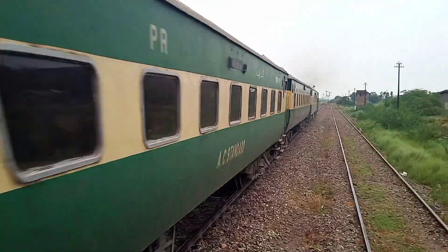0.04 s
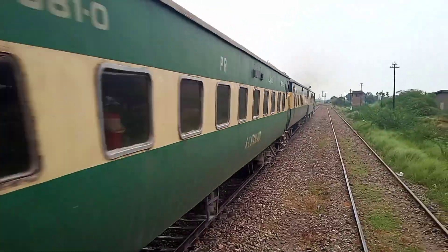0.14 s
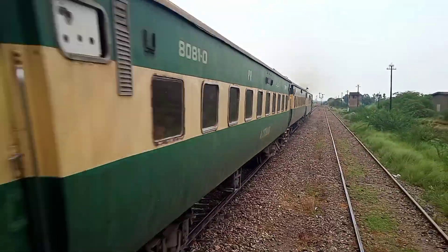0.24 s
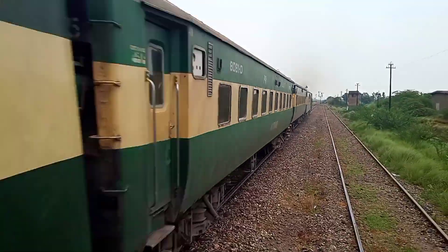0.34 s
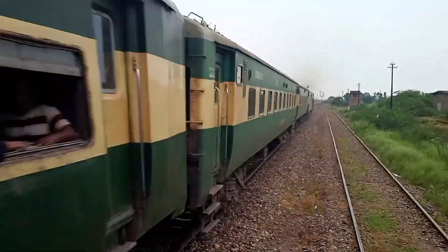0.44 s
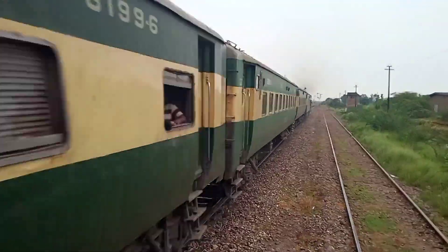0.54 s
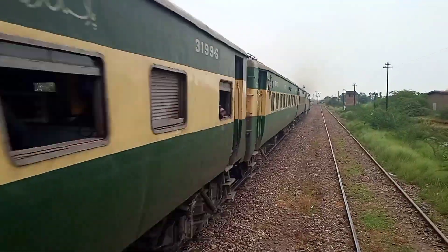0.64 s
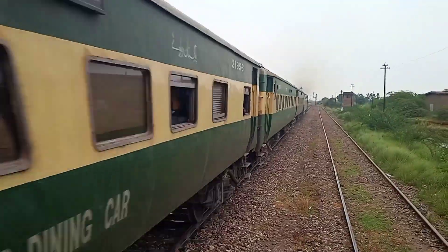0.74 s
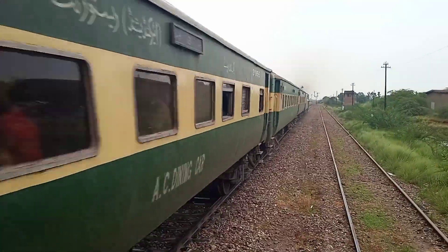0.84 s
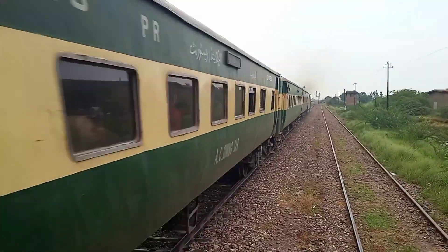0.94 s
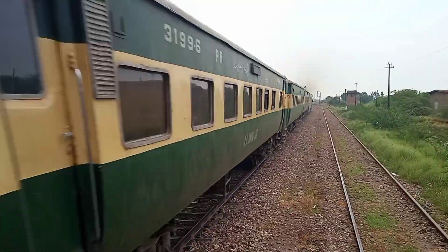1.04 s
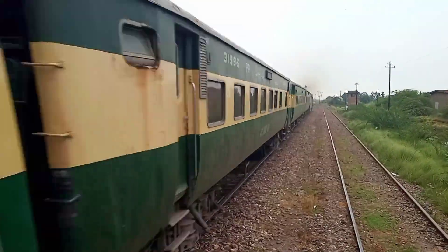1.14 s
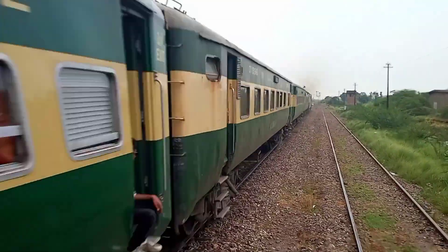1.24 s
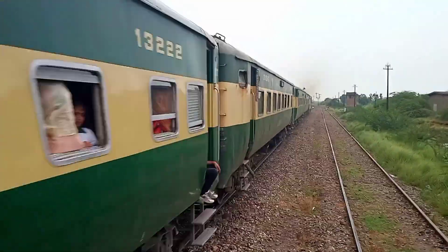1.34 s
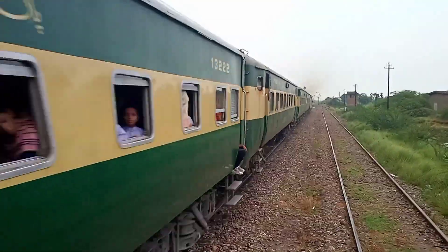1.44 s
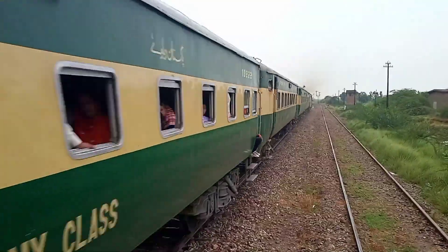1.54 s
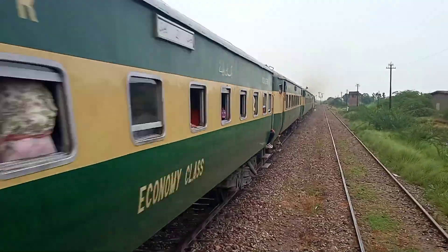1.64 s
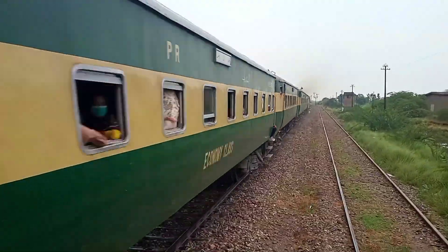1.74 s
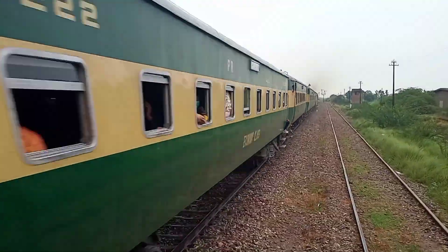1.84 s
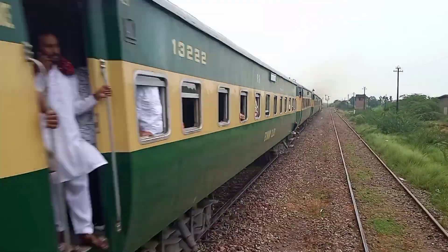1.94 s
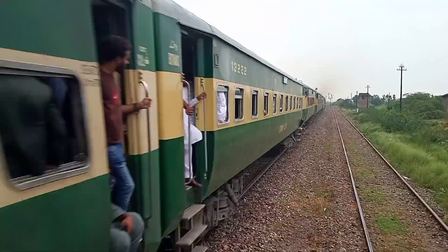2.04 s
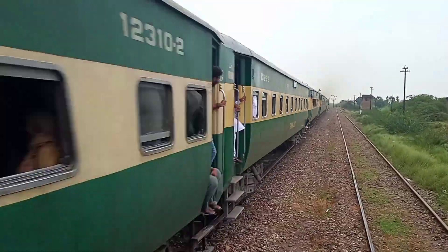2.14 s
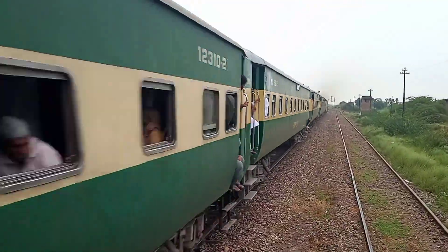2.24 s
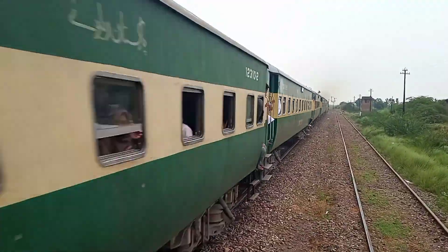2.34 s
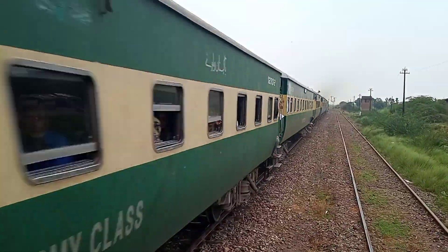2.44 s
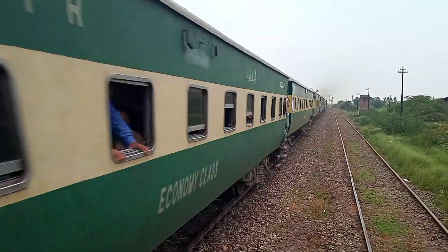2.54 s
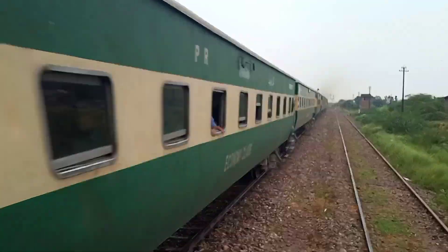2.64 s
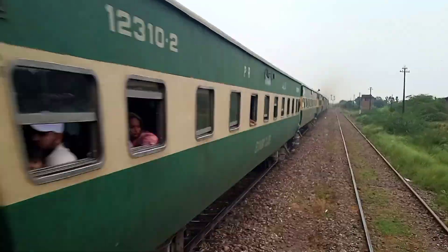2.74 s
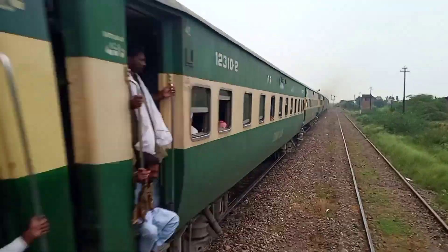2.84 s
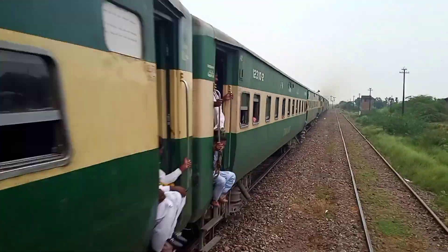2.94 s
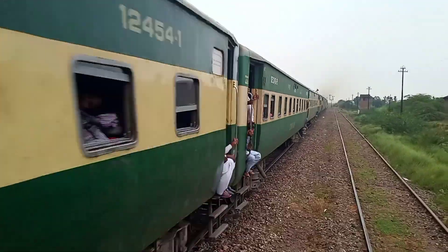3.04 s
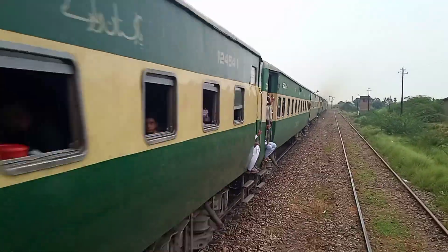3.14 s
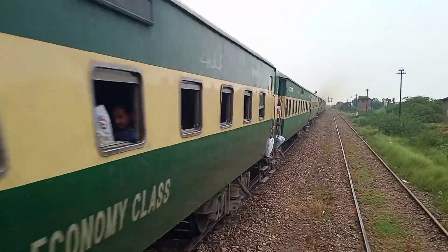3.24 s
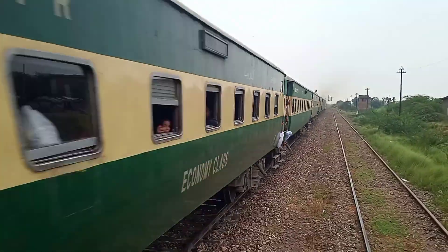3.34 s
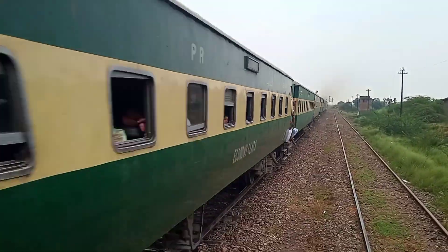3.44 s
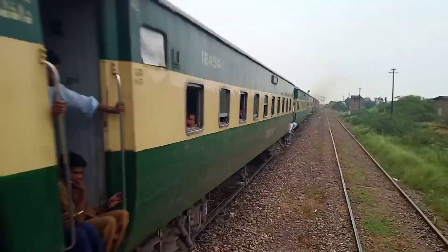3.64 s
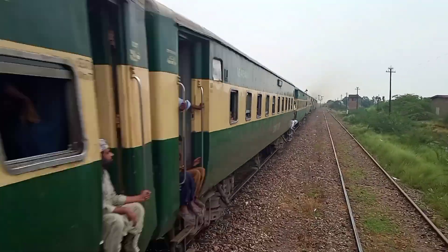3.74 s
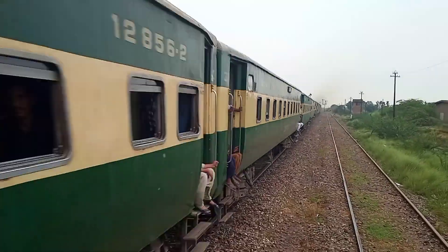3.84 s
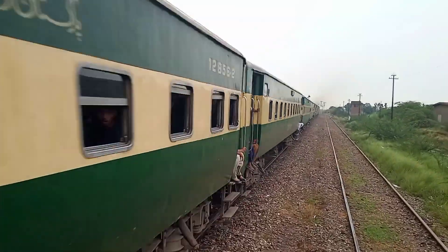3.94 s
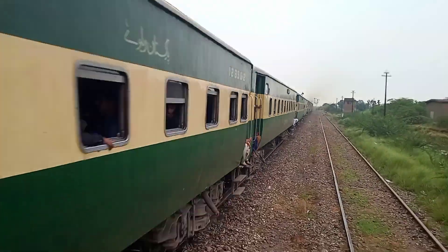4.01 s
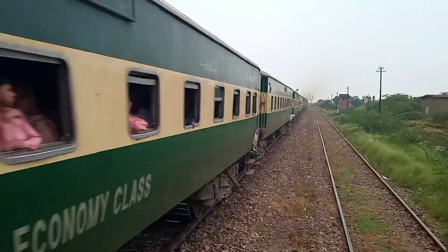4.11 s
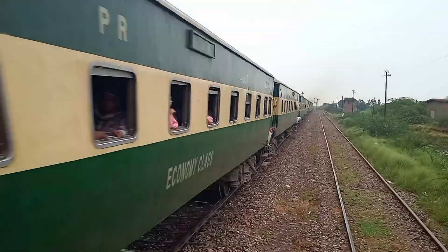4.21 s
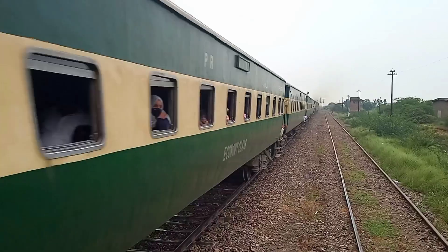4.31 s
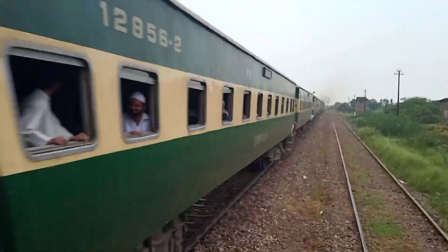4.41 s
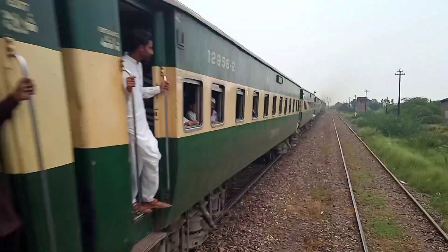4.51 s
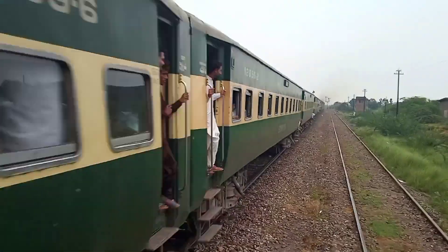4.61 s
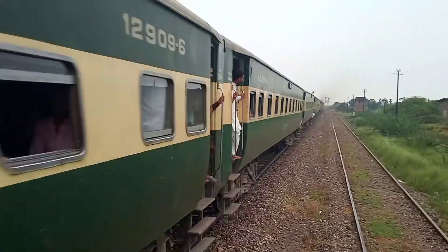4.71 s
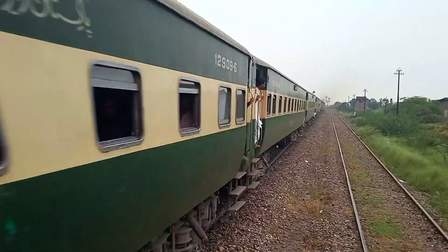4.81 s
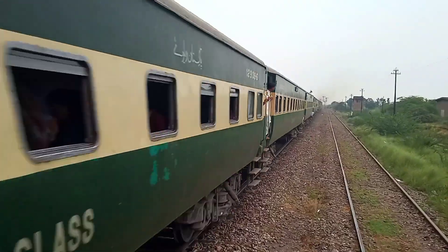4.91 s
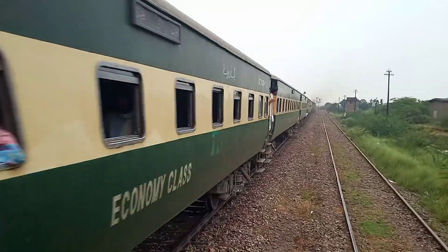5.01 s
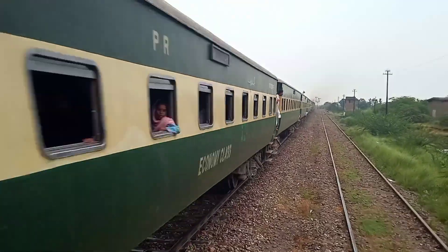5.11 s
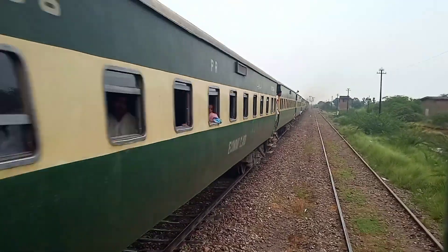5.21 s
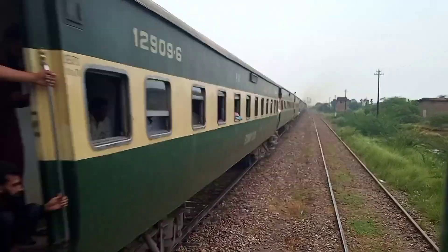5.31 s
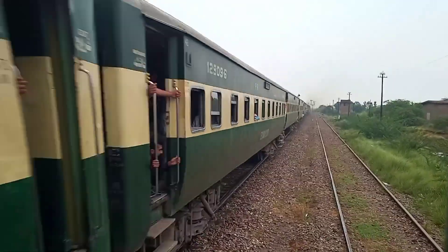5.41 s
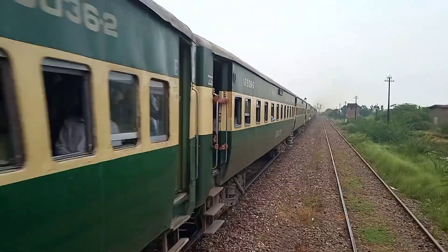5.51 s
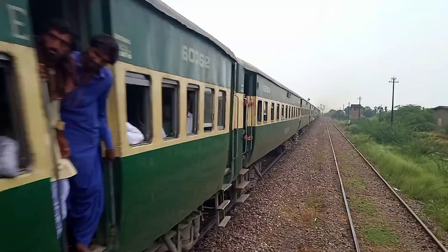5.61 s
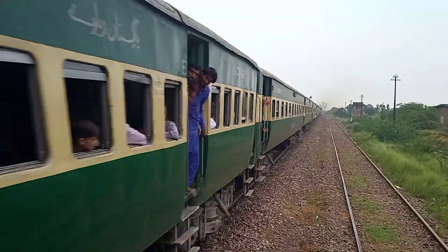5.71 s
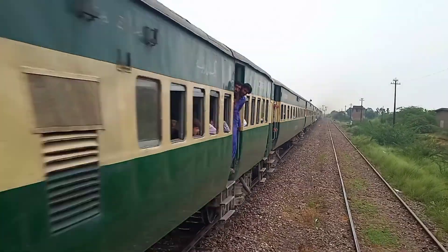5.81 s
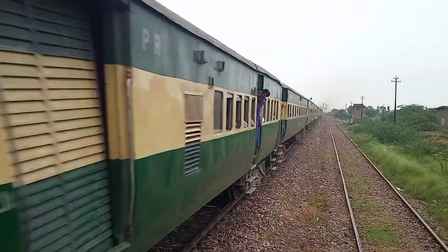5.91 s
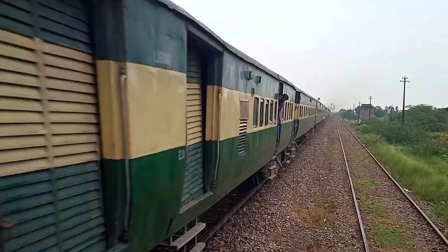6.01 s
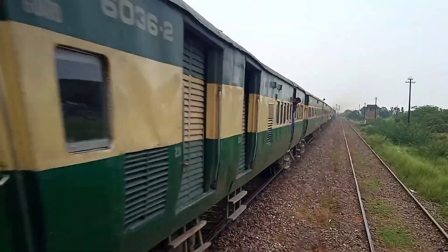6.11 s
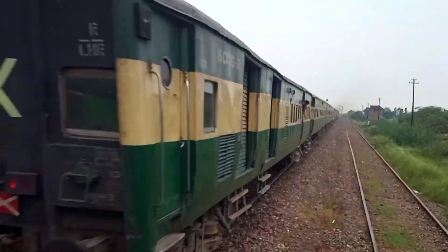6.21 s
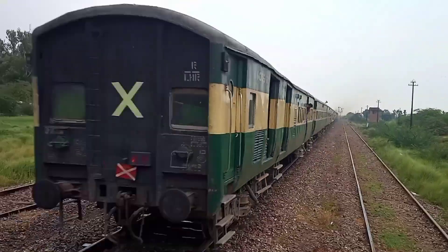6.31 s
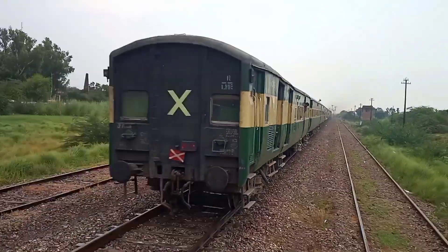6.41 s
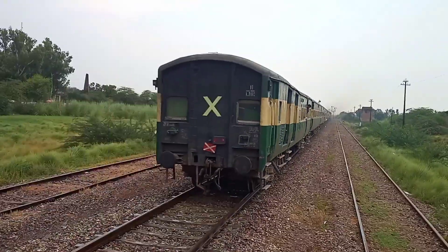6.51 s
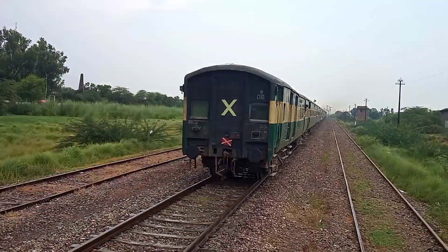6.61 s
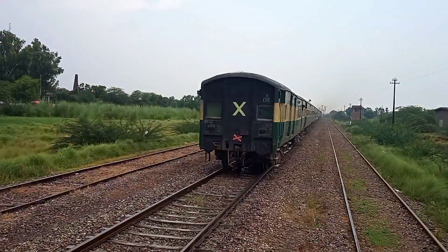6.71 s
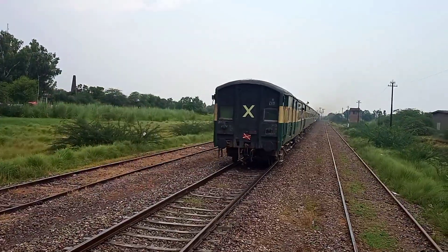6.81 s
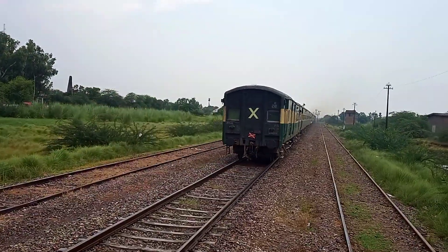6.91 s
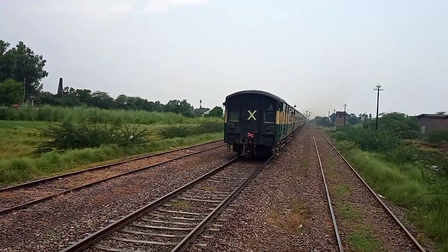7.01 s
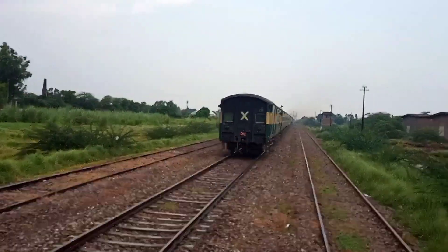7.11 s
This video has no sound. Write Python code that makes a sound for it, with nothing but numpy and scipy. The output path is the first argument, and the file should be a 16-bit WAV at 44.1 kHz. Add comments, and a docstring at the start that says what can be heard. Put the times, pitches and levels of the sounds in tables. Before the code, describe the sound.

From 0 s a passenger train is already rushing past close by on the next track, heard from a train going the other way. Bright, dense steel hiss centred around 5 to 6 kHz covers a rougher midrange roar and low rumble, shuddering unevenly and lifting slightly about every 0.86 s as wheels pass. Faint chirps and wavering rim rings sit inside it. Small squeaks and a scrape come near 1.6 to 1.8 s, another scrape at 2.9 s, a quick gritty clatter at 3.3 s, a squeak at 3.4 s, then clustered squeals and scrapes from 4.1 to 4.6 s. Wind bumps the small microphone throughout, notably at 3.7 s and most heavily at 5 to 5.5 s. The rush eases slightly, then collapses between 6.1 and 6.5 s as the last coach leaves. Until about 7.1 s only faint receding hiss, steady underfloor rolling and small air thumps remain. Identical in both channels.

```python
"""Wheels hiss and roar close by on the next track: a passenger train passes, heard from a train
running the other way; its last coach is gone at 6.3 s. Rolling noise is coloured, patchy noise.
The rims ring faintly as narrow resonances and notes, flanges chirp and scrape in clusters of short tones,
the running gear clatters as struck modes and squeaks on unsteady notes,
and the slipstream buffets a single small microphone with bursts of low noise."""
import sys
import numpy as np
from scipy import signal
from scipy.fft import rfft, irfft
from scipy.io import wavfile
from scipy.ndimage import uniform_filter1d

SR = 44100
rng = np.random.default_rng(int(sys.argv[2]) if len(sys.argv) > 2 else 0)


def unload_audio(sound):
    """Save the sound as a 16-bit wav file, at the path given as the first command line argument."""
    columns = np.transpose(np.atleast_2d(sound))
    # keep every value between -1 and 1, then stretch to whole-number steps
    steps = np.round(np.clip(columns, -1, 1) * 32767)
    wavfile.write(sys.argv[1], SR, steps.astype(np.int16))


N = 315315
TIME = np.arange(N) / SR
FRAME, HOP = 1025, 256  # samples, for colouring noise

# The wheels going by, before each layer's own trim.
# Each row: time in seconds, hiss level in dB, roar level in dB.
WHEELS = [(0.0,-21.5,-29.5), (0.69,-24.5,-28), (0.75,-22,-28), (0.96,-21.5,-28.5), (2.01,-22.5,-31),
          (2.25,-24,-26), (3.06,-21.5,-30), (3.12,-24,-28.5), (4.23,-22,-30), (4.32,-22.5,-30),
          (4.77,-25,-31), (4.83,-24,-27.5), (5.7,-25,-29), (6.09,-25.5,-30), (6.33,-28.5,-32.4),
          (6.51,-36.4,-41.5), (6.99,-36,-44.5), (7.15,-46,-53)]
# Colour of the hiss of steel on steel. Each row: frequency in Hz, relative density in dB.
HISS_COLOUR = [(1500, -70), (3200, -24), (4100, -19.5), (4500, -4), (5000, -1), (5600, 0), (6100, -4),
               (6600, -17), (7100, -23), (8500, -41.5)]


def gain_of(db):
    """Decibels to amplitude."""
    return 10 ** (np.asarray(db) / 20)


def evened(x):
    """Scales to rms 1."""
    return x / np.sqrt(np.mean(x ** 2) + 1e-20)


def curve(table, column):
    """One column of a time table at every sample."""
    rows = np.transpose(table)
    return np.interp(TIME, rows[0], rows[column])


def read(points, hz):
    """A spectrum in dB, interpolated on a log-frequency axis."""
    f, db = np.transpose(points)
    return np.interp(np.log(hz + 1), np.log(f + 1), db)


def add(mix, s, sound):
    """Mixes a sound in at time s."""
    part = mix[round(s * SR):][:len(sound)]
    part += sound[:len(part)]


def wander(rate_hz):
    """Slow chance of rms 1: noise that loses strength above the given rate."""
    hz = np.fft.rfftfreq(N, 1 / SR)
    slow = rfft(rng.standard_normal(N)) / (1 + (hz / rate_hz) ** 4)
    return evened(irfft(slow, N))


def rush(spectrum, patchy_db, patch_hz, patch_s):
    """Noise of a given colour, rms 1, in which patches of the spectrum swell and fade."""
    hz, _, z = signal.stft(rng.standard_normal(N), SR, nperseg=FRAME, noverlap=FRAME - HOP)
    bins, frames = max(1, round(patch_hz * FRAME / SR)), max(1, round(patch_s * SR / HOP))
    patches = uniform_filter1d(rng.standard_normal(z.shape), bins, axis=0)
    patches = evened(uniform_filter1d(patches, frames, axis=1))
    z = z * gain_of(read(spectrum, hz)[:, None] + patchy_db * patches)
    _, noise = signal.istft(z, SR, nperseg=FRAME, noverlap=FRAME - HOP)
    return evened(noise[:N])


def resonate(x, hz, width):
    """A resonance of gain 1 and a width in Hz that follows a pitch."""
    turn = np.exp(2j * np.pi * np.cumsum(hz * np.ones(len(x))) / SR)
    r = np.exp(-np.pi * width / SR)
    # turn the pitch down to zero, smooth there, turn it back up
    return 2 * (turn * signal.lfilter([1 - r], [1, -r], x / turn)).real


def swells(table, column, edge_s):
    """Gain over time of events that rise, hold and fall; the edges are centred on start and end."""
    out = np.zeros(N)
    for row in table:
        start, length = row[0], row[1]
        inside_s = np.minimum(TIME - start, start + length - TIME)
        out += gain_of(row[column]) * np.clip(.5 + inside_s / edge_s, 0, 1)
    return out


def wheel_levels():
    """Hiss and roar in dB, lifted as a pair of bogies goes by with every coach."""
    coach_s, first_bogie_s = 0.857, .01
    bogie_hiss_db, bogie_roar_db = .5, 0.5
    bogies = np.cos(2 * np.pi * (TIME - first_bogie_s) / coach_s)
    hiss_db = curve(WHEELS, column=1) + bogie_hiss_db * bogies
    roar_db = curve(WHEELS, column=2) + bogie_roar_db * bogies
    return hiss_db, roar_db


def rolling():
    """Rough steel on steel: hiss, roar, rumble and fizz, all shaken by the same uneven rail."""
    # Colours of the rolling noise. Each row: frequency in Hz, relative density in dB.
    roar_colour = [(300, -60), (1000, -22.5), (1350, -10), (1650, -6.5), (1900, -2.5), (2250, -2.5),
                   (2800, 1), (3400, -2.5), (4200, 0), (5500, -9), (8500, -44)]
    rumble_colour = [(40, -46), (110, -9), (200, 3), (330, 6), (450, 0.5), (620, -2), (950, 1.5),
                     (1200, 0.5), (1800, -8.5), (4000, -30)]
    fizz_colour = [(5500, -16), (7500, 4), (9000, 5), (11000, 5), (12800, -6), (14000, -15), (14700, 9),
                   (15700, 7.5)]
    hiss_db, roar_db = wheel_levels()
    # the rumble carries far: it keeps only a share of the roar's rise and fall
    rumble_db = -27.5 + 0.43 * roar_db
    judder, surge = wander(rate_hz=14.4), wander(rate_hz=7.7)

    hiss = rush(HISS_COLOUR, patchy_db=1.5, patch_hz=300, patch_s=.045)
    hiss *= gain_of(hiss_db - 0.36 + 0.72 * judder + 0.51 * surge)
    roar = rush(roar_colour, patchy_db=2.0, patch_hz=220, patch_s=0.06)
    roar *= gain_of(roar_db + 1.06 + .5 * judder + 0.24 * surge)
    rumble = rush(rumble_colour, patchy_db=3.0, patch_hz=130, patch_s=0.046)
    rumble *= gain_of(rumble_db + 1.1 * judder)
    # the finest spray of the hiss flutters most
    flutter_db = .8 * judder + .8 * surge + 1.5 * wander(rate_hz=64)
    fizz = rush(fizz_colour, patchy_db=2.5, patch_hz=1500, patch_s=.04)
    fizz *= gain_of(0.8 * hiss_db - 29.5 + flutter_db)
    return hiss + roar + rumble + fizz


def own_wheels():
    """Our own wheels, further off under the floor: a steady bed of coloured, patchy noise."""
    # Colour of that bed. Each row: frequency in Hz, relative density in dB.
    own_colour = [(60, -28), (250, -7), (550, -4.5), (830, 3), (1100, -14), (1350, 7), (2000, -14),
                  (3300, -11), (4100, 6.5), (5200, 0), (8000, -40)]
    return gain_of(-43.5) * rush(own_colour, patchy_db=-2.0, patch_hz=200, patch_s=0.046)


def rims():
    """Rail roughness keeps two wheel modes simmering; now and then the lower one rings out as a clear note."""
    # A wheel rim rings out. Each row: start in seconds, length in seconds, level in dB.
    rings = [(.06, 0.27, -38.5), (1.24, 0.056, -34.5), (1.57, 0.19, -37), (2.1, 0.24, -40.5),
             (2.45, 0.091, -43), (2.85, 0.11, -41.5), (4.06, 0.06, -38.5), (4.26, .15, -39),
             (4.92, 0.25, -43)]
    low_hz, high_hz = 1452, 2670
    under_roar_db = -15
    drift = 1 + 0.016 * wander(rate_hz=2.7)
    low = resonate(rng.standard_normal(N), low_hz * drift, width=170)
    low = evened(resonate(low, low_hz * drift, width=170))
    high = evened(resonate(rng.standard_normal(N), high_hz * drift, width=250))
    simmer = low * gain_of(3.6 * wander(rate_hz=14))
    simmer += high * gain_of(-4.5 + 1.8 * wander(rate_hz=17))
    simmer *= gain_of(curve(WHEELS, column=2) + under_roar_db)

    pitch = low_hz * (1 + 0.0173 * wander(rate_hz=60.6))
    note = np.sin(2 * np.pi * np.cumsum(pitch) / SR)
    note = evened(note * gain_of(3.9 * wander(rate_hz=38)))
    return simmer + note * swells(rings, column=2, edge_s=0.033)


def chirp_cloud(count, low_hz, high_hz, glide):
    """Short notes at random times and pitches, each falling a little as it goes by."""
    out = np.zeros(N)
    for when, pitch, span, size in rng.random((count, 4)):
        u = np.linspace(-1, 1, round((0.034 + 0.056 * span) * SR))
        hz = (low_hz + pitch * (high_hz - low_hz)) * (1 - glide * u / 2)
        note = np.sin(2 * np.pi * np.cumsum(hz) / SR) * signal.windows.hann(len(u))
        # high notes radiate better
        add(out, when * N / SR, size * hz / high_hz * note)
    return out


def chirps():
    """Flanges touch the rail all along the train: faint chirps inside the hiss."""
    cloud = chirp_cloud(count=260, low_hz=1596, high_hz=6510, glide=0.021)
    return cloud * gain_of(curve(WHEELS, column=1) - 2)


def slipstream(steadiness=0.72):
    """Eddies thump the microphone: deep gusts and a lighter flutter, over restless air."""
    # Eddies hitting the microphone, levels before the trim and wander below.
    # Each row: start in seconds, length in seconds, deep thump in dB, light flutter in dB.
    gusts = [(0.2, 0.15, -42.5, -29.5), (0.66, 0.051, -50, -34), (0.96, 0.07, -50, -35),
             (1.35, 0.21, -40.5, -45), (1.59, 0.11, -37, -45), (1.8, 0.11, -40, -41),
             (2.08, 0.054, -44, -30.5), (2.94, 0.051, -37.5, -40), (3.51, 0.06, -43, -32.5),
             (3.72, 0.12, -26.5, -30), (3.83, 0.13, -37, -31.5), (4.08, 0.14, -36.5, -50),
             (4.34, 0.056, -37, -47), (4.48, 0.09, -40, -36.5), (4.75, 0.068, -42, -35.5),
             (5.01, 0.072, -31.5, -32), (5.1, 0.12, -33, -32), (5.21, 0.11, -25, -36),
             (5.39, 0.049, -18, -32), (5.45, 0.1, -25, -36), (5.88, 0.078, -29, -33.5),
             (5.98, 0.19, -38.5, -39), (6.45, 0.086, -35.5, -42), (6.55, 0.065, -30.5, -47),
             (6.75, 0.053, -34, -45)]
    # Colours of the deep and the light air. Each row: frequency in Hz, relative density in dB.
    deep_colour = [(22, -50), (45, -22), (75, 1.5), (115, 7.5), (160, 1), (210, -26.5), (400, -33),
                   (1200, -59)]
    light_colour = [(60, -37), (125, -18), (175, 2), (250, 0.5), (330, -10), (480, -23), (1200, -56)]
    edge_s = 0.045
    gust = rush(deep_colour, patchy_db=5.5, patch_hz=60, patch_s=0.035)
    breeze = rush(light_colour, patchy_db=4.0, patch_hz=90, patch_s=0.034)
    # the eddies of one gust are of like strength
    gust = gust / uniform_filter1d(gust ** 2, size=2400) ** (steadiness / 2)
    breeze = breeze / uniform_filter1d(breeze ** 2, size=2400) ** (steadiness / 2)

    # between gusts the air keeps stirring; the deep part more so in the wake of the last coaches
    eddies = wander(rate_hz=11)
    wake_db = 4 * np.clip((TIME - 3.6) / 1.2, 0, 1)
    stir = gain_of(-52 + wake_db + 2.8 * eddies)
    # the light stirring dies away behind the last coach, at 5.5 dB per second
    calm_db = 5.5 * np.maximum(TIME - 6.47, 0)
    flutter = gain_of(-44 - calm_db + 2.5 * eddies)

    deep = np.hypot(swells(gusts, column=2, edge_s=edge_s), stir)
    light = np.hypot(swells(gusts, column=3, edge_s=edge_s), flutter)
    thumps = gust * deep * gain_of(-0.3 + 1.4 * wander(rate_hz=14))
    return thumps + breeze * light * gain_of(-3.0 + 1.75 * wander(rate_hz=11))


def squeaks(waver=0.022):
    """Steel sticks and slips for a moment on one unsteady note."""
    # Short squeaks and groans, before the shared tremor.
    # Each row: start in seconds, length in seconds, middle pitch in Hz, level in dB.
    steel_notes = [(.01, 0.14, 1334, -39.5), (0.71, 0.043, 3550, -29), (1.572, 0.051, 1045, -39),
                   (1.6, 0.055, 2950, -30), (1.604, 0.057, 2000, -38), (1.71, 0.071, 5710, -33),
                   (3.444, 0.029, 2710, -21.5), (3.81, 0.045, 4840, -27), (4.137, 0.047, 6570, -29),
                   (4.266, 0.052, 2693, -31), (4.32, 0.075, 3170, -36), (4.372, 0.042, 2260, -28.5),
                   (4.416, 0.046, 6500, -34), (4.43, 0.058, 2550, -34), (4.729, 0.042, 4550, -28),
                   (4.845, 0.043, 4450, -27), (5.11, 0.07, 329, -30)]
    out, unsteady = np.zeros(N), 1 + waver * wander(rate_hz=260)
    for s, length, hz, db in steel_notes:
        pitch = hz * unsteady[round(s * SR):][:round(length * SR)]
        note = np.sin(2 * np.pi * np.cumsum(pitch) / SR) * signal.windows.tukey(len(pitch), .6)
        add(out, s, gain_of(db) * evened(note))
    tremor = evened(gain_of(2.0 * wander(rate_hz=170)))
    return out * tremor


def scrapes(squeal_db=-4):
    """A flange pressed against the rail: a burst of hiss with a cluster of squealing partials."""
    # A flange scrapes along the rail. Each row: start in seconds, length in seconds, level in dB.
    presses = [(.02, 0.045, -26), (1.7, 0.077, -24), (2.85, .08, -22.5), (4.13, .07, -22),
               (4.25, 0.06, -23), (4.32, 0.083, -19), (4.42, 0.042, -23), (4.54, .11, -24)]
    grind = rush(HISS_COLOUR, patchy_db=4, patch_hz=153, patch_s=.04)
    squeal = evened(chirp_cloud(count=1400, low_hz=1600, high_hz=6210, glide=.02))
    scrape = evened(grind + gain_of(squeal_db) * squeal)
    return scrape * swells(presses, column=2, edge_s=0.026)


def clanks(low_hz=390, high_hz=6200, contact_s=0.0091):
    """Each blow on the running gear is a brief gritty contact that rings the same steel parts."""
    # Blows. Each row: time in seconds, level in dB of the first 10 ms before the band limit.
    blows = [(1.58, -30.5), (1.617, -34), (3.273, -22.5), (3.283, -20), (3.293, -20.5), (3.303, -22),
             (3.322, -21), (4.996, -29)]
    # Modes of the running gear. Each row: middle frequency in Hz, level in dB, 60 dB decay in seconds.
    modes = [(510, -5.5, 0.058), (630, -2, 0.044), (754, -11, 0.03), (954, -1.5, 0.033), (1417, -3, 0.093),
             (1870, -5.5, 0.044), (2030, 4.5, .06), (2576, 4.5, .06), (3040, 3, 0.051), (3230, 2.5, 0.058),
             (5390, 3.5, 0.046)]
    t, out = np.arange(SR // 6) / SR, np.zeros(N)
    for s, db in blows:
        contact = rng.standard_normal(len(t)) * np.exp(-t / contact_s)
        blow = np.zeros(len(t))
        for hz, mode_db, t60 in modes:
            # the point struck shifts each mode a little
            struck_hz = hz * (1 + rng.normal(0, 0.013))
            ring = gain_of(-60 * t / t60) * np.sin(2 * np.pi * struck_hz * t)
            blow += gain_of(mode_db) * evened(signal.fftconvolve(contact, ring)[:len(t)])
        add(out, s, gain_of(db) * blow / blow[:SR // 100].std())
    # parts this small radiate no bass, and their contacts are too blunt for high treble
    band = signal.butter(4, [low_hz, high_hz], "bandpass", fs=SR, output="sos")
    return signal.sosfilt(band, out)


def scene():
    """Everything reaches one microphone, the same in both channels."""
    train = rolling() + rims() + chirps() + squeaks() + scrapes() + clanks()
    mono = train + own_wheels() + slipstream()
    return np.array([mono, mono])


def record(dry):
    """The recorder's band limit: a steep low-pass that removes the highest treble."""
    edge_hz = 15850
    low_pass = signal.firwin(511, edge_hz, window=("kaiser", 9), fs=SR)
    return signal.oaconvolve(dry, low_pass[None], "same")


dry = scene()
out = record(dry)
unload_audio(out)
```